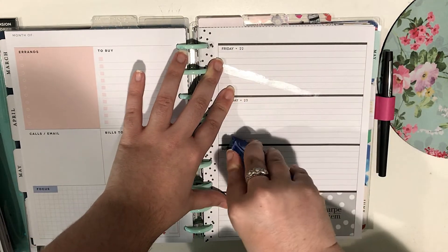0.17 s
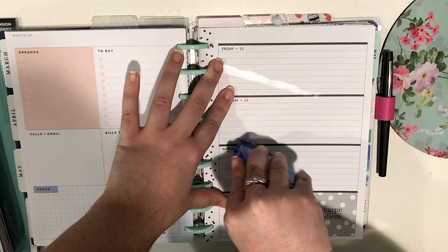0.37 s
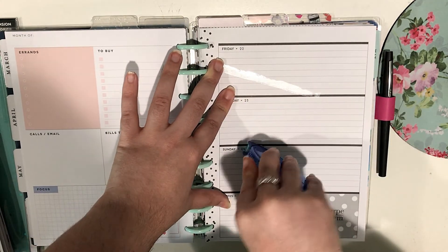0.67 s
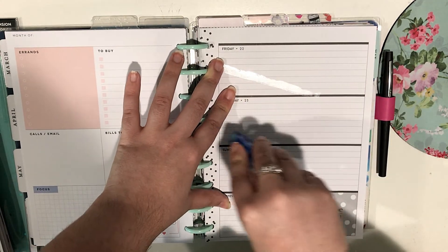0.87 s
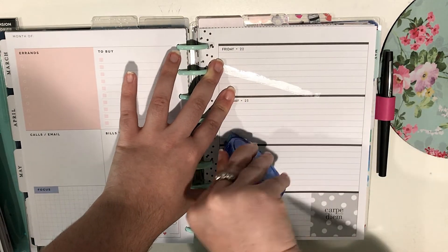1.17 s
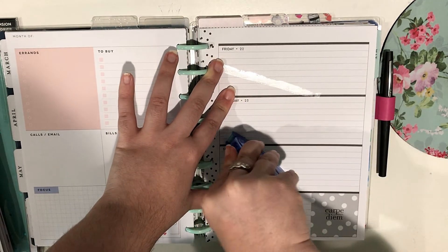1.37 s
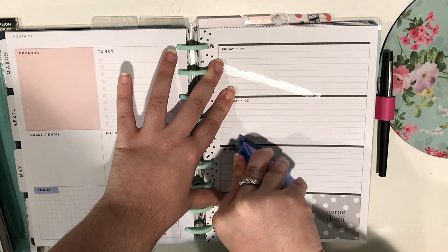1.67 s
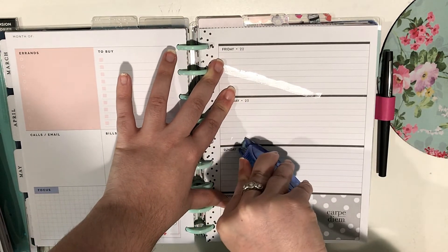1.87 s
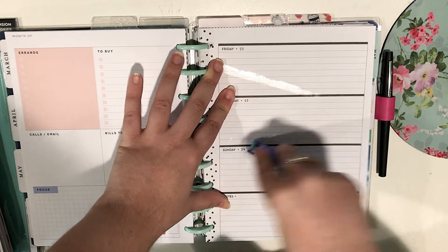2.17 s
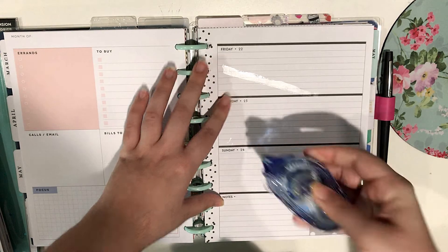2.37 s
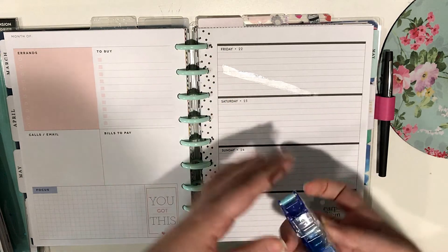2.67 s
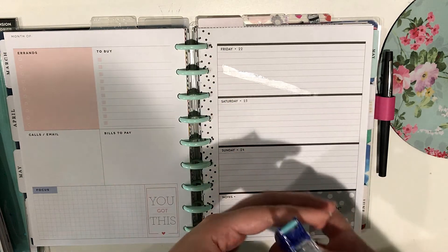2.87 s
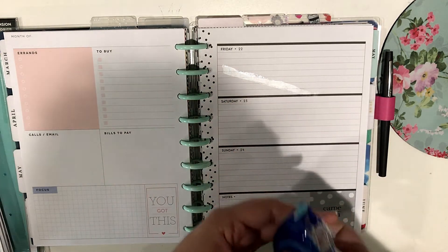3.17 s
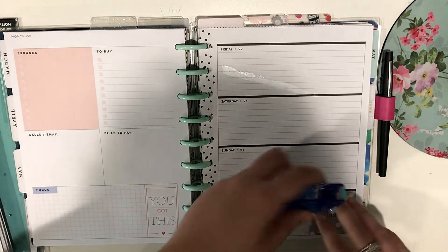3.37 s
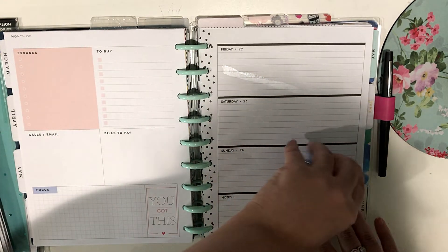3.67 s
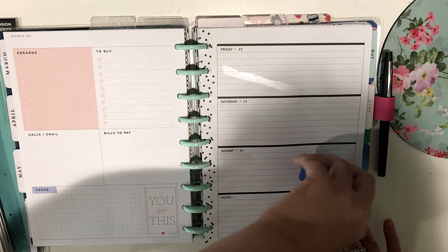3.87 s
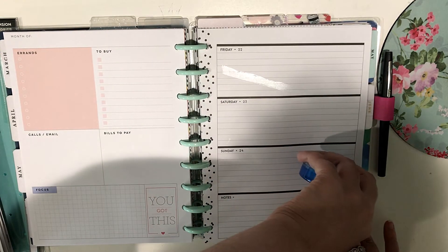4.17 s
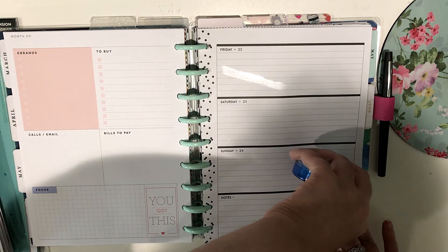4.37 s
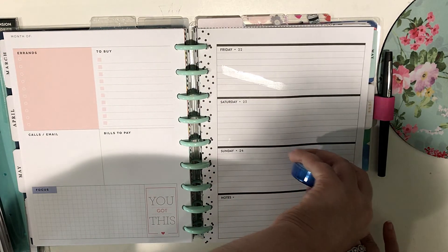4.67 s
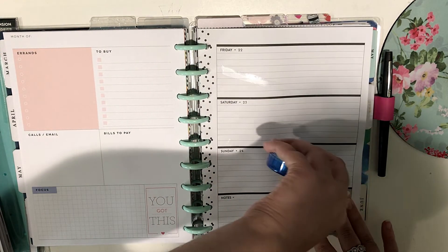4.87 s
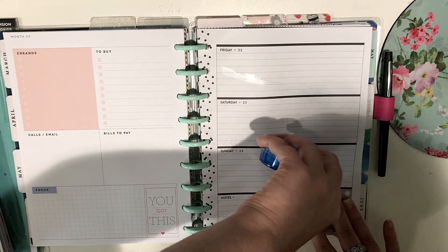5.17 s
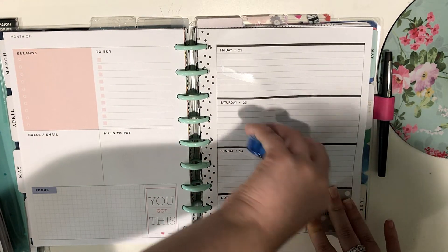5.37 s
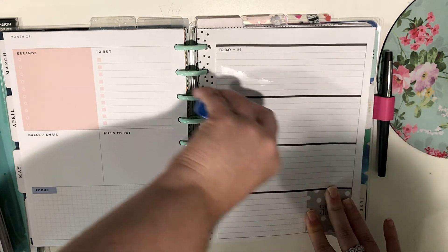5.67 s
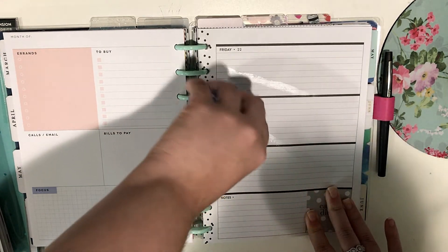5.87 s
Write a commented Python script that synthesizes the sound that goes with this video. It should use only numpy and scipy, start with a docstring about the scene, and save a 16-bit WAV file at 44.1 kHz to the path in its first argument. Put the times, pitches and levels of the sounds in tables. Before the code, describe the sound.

Light plastic clicks, creaks and paper brushing on a desk lead to two short, hissing, rattling pulls of a tape runner.

```python
"""A tape runner is pressed and dragged over the pages of a planner on a desk in a quiet room.
In two strokes its ratchet (a toothed wheel) snaps tooth by tooth and makes the plastic case ring.
The case creaks, case and paper give small clicks, skin brushes the paper and the desk thumps softly.
Underneath, the house rumbles and hums."""
import sys
import numpy as np
from scipy import signal
from scipy.fft import rfft, irfft
from scipy.io import wavfile

SR = 44100
rng = np.random.default_rng(int(sys.argv[2]) if len(sys.argv) > 2 else 0)


def log_audio(samples):
    """Write samples as a 16-bit WAV file to the path given in sys.argv[1]."""
    # one column per channel
    frames = np.atleast_2d(samples).T
    # limit to full scale, then quantise
    limited = np.clip(frames, -1, 1)
    pcm = np.round(limited * 32767).astype(np.int16)
    wavfile.write(sys.argv[1], SR, pcm)


N = 265041

# Tone colours, or how strong each frequency is next to the others: f/Hz, level/dB
RUMBLE_COLOUR = [(12, -51), (20, -17.5), (32, -9.5), (59, -2), (81, 1.5), (108, -1), (127, 2), (145, -4),
                 (157, -6.5), (172, -13), (200, -34.5), (234, -35), (300, -24.5), (390, -58), (660, -120)]
AIR_COLOUR = [(120, -13.5), (200, 6), (258, -4), (761, -13), (1060, -14), (1730, -17.5), (2080, -16),
              (2790, -19.5), (6850, -21), (7640, -26), (12800, -23.5), (15900, -28)]
SKIN_COLOUR = [(1470, -31), (2500, -2.5), (2680, -6), (3030, -8), (3800, -10), (4200, -9), (5510, -11),
               (6140, -10), (8430, -11.5), (15900, -14)]
TICK_COLOUR = [(410, -34.5), (700, -6.5), (1700, -13.5), (2040, -8.5), (2450, -1.5), (3490, -23), (4480, 0),
               (15900, -14)]
SNAP_COLOUR = [(400, -72.5), (900, -18.5), (2000, -18.5), (3500, -22), (4700, -14.5), (6400, -16.5),
               (8500, -9.5), (10300, -14), (13000, -9), (14700, -8), (15900, -9.5)]

# Resonances, the pitches at which a thing likes to ring: f/Hz, width/Hz, level/dB
DESK_MODES = [(103.4, 9.3, 2), (134.5, 14.7, 20), (230, 104, -5)]
PAGE_MODES = [(346, 85, -6), (562, 90, -6.5), (1009, 370, -7)]
HOLLOW_MODES = [(1242, 190, -6), (1630, 154, 1.5), (1843, 163, 1.5)]   # the air inside the case
SHELL_MODES = [(2550, 152, 1), (2930, 128, -0.5), (3217, 99, 1.5), (3948, 305, -2.5)]   # the walls of the case
PAWL_MODES = [(5260, 166, 4.5), (5870, 660, 3.5), (6620, 610, 6.5), (7520, 310, 3.5), (8280, 1000, -5.5)]   # the pawl, a small catch that rides over the teeth

# Echoes off the desk and pages: delay/s, level/dB
ECHOES = [(.0014, -14.5), (.0031, -20), (.0052, -16.5)]
# How loud the hum is over time: t/s, level/dB
HUM_LEVELS = [(0.0, -47.5), (0.5, -51.5), (0.85, -58), (1.02, -57), (1.2, -50.5), (1.9, -56), (2.29, -45.5),
              (2.46, -67), (2.85, -59.5), (3.3, -43.5), (3.8, -46), (4.03, -55), (4.28, -46.5), (4.74, -50),
              (4.97, -54.5), (5.2, -49.5), (5.5, -68), (5.71, -48), (6.01, -48.5)]
# A faint whistle comes and goes: t/s, length/s, level/dB
WHISTLES = [(0.0, 0.086, -60), (.17, 0.018, -65), (.24, .14, -66), (2.43, .19, -72)]
# Faint narrow tones that come and go: t/s, length/s, level/dB, f/Hz
FAINT_RINGS = [(3.595, 0.036, -67, 810), (3.723, 0.045, -66, 940), (3.89, 0.092, -59, 2680),
               (4.014, 0.021, -52.5, 2600), (4.17, 0.22, -68, 2710)]
# Skin brushes the paper: t/s, length/s, level/dB
BRUSHES = [(0.0, 0.027, -59.5), (.35, 0.085, -61), (.495, .02, -62), (.72, 0.11, -61), (.995, 0.018, -63),
           (1.525, .02, -61), (1.62, 0.017, -60.5), (1.7, 0.033, -60.5), (1.805, 0.02, -55.5),
           (1.98, 0.013, -60), (2.255, 0.086, -60.5), (2.67, 0.025, -59.5), (2.85, 0.013, -63),
           (3.07, 0.11, -62.5), (3.4, 0.19, -70), (3.68, 0.036, -61), (3.885, 0.019, -69),
           (4.17, 0.061, -59.5), (4.27, 0.086, -55)]
# The hand squeezes the case against the pages: t/s, length/s, creak level/dB, page level/dB
SQUEEZES = [(.165, 0.14, -62.5, -69), (.4, 0.089, -70, -64.5), (.72, 0.022, -64, -60),
            (.77, 0.022, -61, -66), (1.04, 0.023, -58.5, -65), (1.13, 0.17, -76, -64),
            (1.41, 0.0095, -69, -67), (1.525, .03, -66, -67), (1.7, 0.17, -67.5, -74),
            (1.985, .02, -72, -82), (2.095, 0.036, -55, -61), (2.195, 0.012, -57, -85),
            (2.25, 0.13, -63.5, -72), (2.44, 0.096, -69, -79), (2.64, 0.062, -61, -72),
            (2.85, 0.0071, -62, -91), (3.07, 0.038, -61.5, -80), (3.32, 0.02, -64, -80),
            (3.415, 0.039, -73, -69), (3.61, 0.1, -61.5, -68), (3.74, 0.028, -78, -71),
            (3.82, 0.011, -63, -70), (3.885, 0.039, -49.5, -58), (3.95, 0.066, -60.5, -68),
            (4.02, 0.065, -58.5, -60), (4.17, .18, -70.5, -71), (4.46, 0.071, -83, -63),
            (4.61, 0.051, -56.5, -61.5)]
# The tape drags, one list for each stroke: t/s, hiss level/dB, creak level/dB, page level/dB
STROKES = [
    [(4.65, -52, -51, -63), (4.68, -53, -64, -62), (4.82, -45, -41, -51), (4.95, -52, -66, -58),
     (5.1, -50, -53, -61), (5.18, -62, -64, -62), (5.22, -85, -85, -80)],
    [(5.293, -62, -66, -66), (5.33, -45, -50, -51), (5.5, -45.5, -48.5, -63), (5.63, -39.5, -41, -52),
     (5.72, -34.5, -42, -56), (5.78, -66, -51, -54), (5.91, -58, -55.5, -68.5), (5.96, -74, -73, -71)],
]
# Pushes into the desk: t/s, desk level/dB, page level/dB
THUMPS = [(.2478, -44, -38.5), (.2932, -48, -37), (.5082, -48, -62), (.9937, -39, -44), (1.0021, -36, -47),
          (1.1218, -53, -44), (1.1506, -35, -49), (1.1657, -31, -38.5), (1.1837, -26, -50),
          (1.2042, -32.5, -33.5), (1.2256, -26, -36), (1.4092, -41.5, -70), (1.517, -41.5, -43.5),
          (1.5324, -49, -42), (2.3266, -40, -36), (3.22, -49, -50), (3.8357, -69, -45), (3.8618, -59, -48),
          (4.0143, -47, -42), (4.4039, -55, -43), (4.4518, -40, -61), (4.5461, -43, -43),
          (4.7188, -30, -72), (4.7638, -32, -62), (4.8066, -35, -64), (4.9391, -45, -51),
          (5.1738, -45, -39), (5.3103, -56, -48), (5.675, -38, -37), (5.7006, -38.5, -37)]
# Small clicks of case and paper, and weak slips of the ratchet's teeth during the first stroke:
# t/s, crack level/dB, hollow level/dB, shell level/dB
TICKS = [(0.0189, -49, -56, -71), (0.0583, -42, -46.5, -58), (0.159, -28, -31.5, -40),
         (0.2483, -25.5, -34, -37), (0.293, -21, -36.5, -39.5), (0.4034, -43, -49, -60),
         (0.4909, -34, -51, -50), (0.5089, -35, -48, -49), (0.5692, -33, -41.5, -46),
         (0.625, -40, -61, -47), (0.693, -62, -53, -52), (0.7262, -37, -33.5, -42), (0.7729, -39, -43, -66),
         (0.84, -40, -45.5, -61), (0.9938, -27.5, -46, -50), (1.0018, -21, -40.5, -36.5),
         (1.1216, -24.5, -46, -47), (1.1646, -44, -53, -51), (1.1826, -37, -40.5, -47),
         (1.2036, -33, -40, -42), (1.2251, -40, -48, -44), (1.2372, -38, -51, -46),
         (1.3455, -36.5, -44, -48.5), (1.4102, -35, -45.5, -47), (1.5164, -43, -53, -54),
         (1.5296, -34, -41, -51), (1.681, -26, -41.5, -51), (1.7715, -53, -66, -58), (2.024, -31, -53, -59),
         (2.0498, -39, -46, -47.5), (2.097, -54, -37, -46.5), (2.1326, -38, -30, -42.5),
         (2.1888, -31.5, -44, -38.5), (2.2037, -43, -44, -61), (2.2523, -45, -47, -54),
         (2.2592, -39, -42.5, -54), (2.3261, -25.5, -22.5, -25), (2.376, -53, -41, -51),
         (2.4664, -51, -44.5, -52), (2.581, -44.5, -68, -60), (2.6362, -47, -46, -64),
         (2.6845, -34.5, -49.5, -50), (2.8466, -29, -39, -39.5), (2.8611, -31, -49, -49),
         (2.9564, -60, -51, -59), (3.0581, -40, -43.5, -49), (3.088, -44, -44, -42),
         (3.16, -30.5, -36.5, -40.5), (3.1944, -39.5, -58, -51), (3.2197, -56, -53, -52),
         (3.2968, -44, -53, -62), (3.3278, -41, -51, -52), (3.4087, -34, -47, -41),
         (3.4267, -30.5, -38.5, -37.5), (3.463, -44, -52, -45.5), (3.5883, -37, -45.5, -43),
         (3.6212, -42, -48, -48), (3.6709, -24, -48, -41), (3.699, -19, -51, -36), (3.7185, -41, -41, -50),
         (3.8072, -41.5, -49, -58), (3.8453, -37.5, -44, -46.5), (3.8843, -38, -35, -51),
         (3.965, -59, -62, -46.5), (4.0149, -21, -37, -31), (4.0714, -43, -64, -56),
         (4.2895, -43, -45, -53), (4.3145, -41, -43, -49), (4.3434, -47, -48, -55),
         (4.4046, -35.5, -39, -42.5), (4.4523, -40, -49, -44.5), (4.4722, -31.5, -53, -48),
         (4.5208, -42, -47, -46.5), (4.5456, -52, -49, -52), (4.6124, -66, -59, -48),
         (4.9376, -26, -34, -39), (4.9724, -20, -39, -35), (5.0344, -33, -46, -48), (5.0494, -33, -53, -43),
         (5.0703, -38, -52, -37), (5.0874, -18.5, -31, -32), (5.1571, -20, -38, -32.5),
         (5.1652, -26, -54, -46), (5.173, -33, -56, -38.5), (5.7847, -21, -56, -36),
         (5.8279, -30, -42, -44), (5.87, -37, -49, -46), (5.8958, -22, -46, -38.5)]
# Ringing next to a tooth's snap: t/s, hollow level/dB, shell level/dB, pawl level/dB
TOOTH_RING = [(4.66, -21, -11, -8.5), (4.72, -13.5, -16.5, -15), (4.765, -16.5, -16, -12.5),
              (4.79, -22, -21, -16), (4.82, -12, -21, -17.5), (4.88, -19.5, -22, -20),
              (5.0, -23.5, -21, -18.5), (5.1, -21, -17, -17), (5.3, -28, -16.5, -22.5),
              (5.34, -27, -26, -14), (5.37, -20, -30.5, -9), (5.44, -19.5, -15.5, -7),
              (5.5, -22.5, -18.5, -9.5), (5.54, -13.5, -17.5, -9.5), (5.6, -19.5, -17.5, -11),
              (5.7, -11, -19.5, -6), (5.74, -19, -24, -18)]
# The teeth of the ratchet snap: t/s, level/dB
TEETH = [(4.6622, -9), (4.719, -5.5), (4.7437, -4.5), (4.7644, -6.5), (4.7913, -5), (4.8068, -4),
         (4.82, -1.5), (4.8352, -6), (4.8774, -1.5), (4.9175, -2.5), (4.996, -2), (5.0978, -1.5),
         (5.2948, -16.5), (5.3099, 0.5), (5.339, -2.5), (5.3565, -2), (5.3737, -2), (5.395, -2),
         (5.4196, -4.5), (5.441, -4), (5.462, -5), (5.4919, -3.5), (5.5229, -8), (5.5392, -5.5),
         (5.553, -5), (5.5703, -7), (5.5876, -3.5), (5.6053, -4), (5.617, -5.5), (5.6283, -6.5),
         (5.6408, -6), (5.6512, -5.5), (5.6612, -8.5), (5.675, -8.5), (5.6879, -9.5), (5.7018, -10),
         (5.717, -9.5), (5.7384, -3)]

RUMBLE_DB, AIR_DB, MAINS_DB = -48.5, -62, -57.5
MAINS_HZ, HUM_HZ, WHISTLE_HZ = 52, 108.5, 2396
ROOM_T60_S, ROOM_DB = 0.13, -16   # a T60 is the time a sound takes to fade by 60 dB
SWELL_DB_PER_S, FADE_DB_PER_S = 443, 321
RESTING_DB = (-81.5, -97, -81)   # hiss, creak and page rustle of hands at rest
SLIPS_PER_S = 135   # typical pace of a creak
FAINT_TICKS, FAINT_DB = 30, (-48, -58, -58.5)   # extra random ticks: average crack, hollow, shell
TOOTH_DESK_DB, TOOTH_PAGE_DB = -48, -49   # push of a tooth, next to its snap
TICK_PAGE_DB = -18   # push of a tick, next to its hollow ring
CREST_DB = 11.5   # how far the peaks of a chatter stand above its average (rms) level


def amp(db):
    """Turn decibels into a number to multiply by."""
    return 10 ** (np.asarray(db) / 20)


def rms_one(x):
    """Scale a sound to an average strength (rms) of 1."""
    return x / np.sqrt(np.mean(x ** 2) + 1e-20)


def in_time(rows):
    """Join the points of a table with straight lines, one curve for each level column."""
    times, *columns = np.transpose(rows)
    return [np.interp(np.arange(N) / SR, times, column) for column in columns]


def swells(rows, column=2):
    """Loudness of sounds that swell up to their start time, hold for their length and fade."""
    t, gain = np.arange(0, N, 32) / SR, 0
    for row in rows:
        start, length = row[:2]
        drop_db = np.maximum(SWELL_DB_PER_S * (start - t), FADE_DB_PER_S * (t - start - length))
        gain = gain + amp(row[column] - np.maximum(0, drop_db))
    return np.interp(np.arange(N) / SR, t, gain)


def colour(x, spectrum):
    """Give a sound a tone colour; white noise keeps its power."""
    hz, db = np.transpose(spectrum)
    grid_hz = np.maximum(np.arange(16385) * SR / 32768, 1)
    gain = rms_one(amp(np.interp(np.log(grid_hz), np.log(hz), db)))
    # A minimum-phase filter: nothing sounds before the click that causes it.
    cepstrum = irfft(np.log(gain))
    cepstrum[1:16384] *= 2
    cepstrum[16385:] = 0
    return signal.fftconvolve(x, irfft(np.exp(rfft(cepstrum))))[:N]


def resonate(x, modes):
    """Ring several resonances at once, with alternating signs; white noise keeps its power."""
    def ring(push):
        total = 0
        for k, (hz, width, db) in enumerate(modes):
            r = np.exp(-np.pi * max(width, 5) / SR)
            feedback = [1, -2 * r * np.cos(2 * np.pi * hz / SR), r * r]
            mode = signal.lfilter([1 - r * r, 0, r * r - 1], feedback, push + 1e-18)
            total = total + (-1) ** k * amp(db) * mode
        return total
    return ring(x) / np.sqrt(np.sum(ring(signal.unit_impulse(8192)) ** 2))


def drift(rate_hz):
    """A smooth random wobble, about 1 in size."""
    r = np.exp(-2 * np.pi * rate_hz / SR)
    return rms_one(signal.lfilter([1], [1, -2 * r, r * r], rng.standard_normal(N + SR))[SR:])


def wavering(hz, spread_hz):
    """A tone whose pitch wanders slowly."""
    pitch_hz = hz + spread_hz * drift(3.04)
    return np.sqrt(2) * np.sin(2 * np.pi * np.cumsum(pitch_hz) / SR)


def pitched_noise(hz, width_hz):
    """Noise sent twice through one resonance becomes a breathy note."""
    mode = [(hz, width_hz, 0)]
    return rms_one(resonate(resonate(rng.standard_normal(N), mode), mode))


def impulses(times, db):
    """One sharp spike at each time."""
    spikes = np.zeros(N)
    np.add.at(spikes, np.minimum((times * SR).astype(int), N - 1), amp(db))
    return spikes


def chatter(spread_db):
    """Tightly packed tiny hits whose strength flickers."""
    return rms_one(rng.choice([-1., 1.], N) * amp(spread_db * drift(1290)))


def bursts(times, db, t60, first_hit, spread_db):
    """Each contact is one hit, then a chatter that dies away."""
    hits = impulses(times + 0.0004, db)
    fade = signal.lfilter([1], [1, -amp(-60 / (t60 * SR))], hits + 1e-18)
    return first_hit * hits + fade * chatter(spread_db)


def near_echoes(x):
    """Bounces off the desk and pages stretch a sound by a few milliseconds."""
    return x + sum((-1) ** k * amp(db) * np.pad(x, (int(delay * SR), 0))[:N]
                   for k, (delay, db) in enumerate(ECHOES))


def room(x):
    """The walls answer with a short, slightly dull wash of echoes."""
    t = np.arange(int(.4 * SR)) / SR
    tail = rng.standard_normal(len(t)) * amp(-60 * t / ROOM_T60_S) * (t > .004)
    tail = signal.lfilter([1], [1, -.3], tail)
    return signal.fftconvolve(x, tail / np.sqrt(np.sum(tail ** 2)))[:N]


def background():
    """House rumble, mains drone, a hum with a weak octave, room air and a faint whistle."""
    rumble = amp(RUMBLE_DB) * rms_one(colour(rng.standard_normal(N), RUMBLE_COLOUR))
    hum_tone = wavering(HUM_HZ, spread_hz=2.49) + amp(-37.5) * wavering(2 * HUM_HZ, spread_hz=2.1)
    hum = amp(in_time(HUM_LEVELS)[0]) * hum_tone
    air = amp(AIR_DB) * rms_one(colour(rng.standard_normal(N), AIR_COLOUR))
    mains = amp(MAINS_DB) * wavering(MAINS_HZ, spread_hz=1.5)
    whistle = swells(WHISTLES) * pitched_noise(WHISTLE_HZ, width_hz=70)
    return rumble + mains + hum + air + whistle


def faint_rings():
    """Faint narrow tones ring on, one pitch at a time."""
    return sum(swells([row]) * pitched_noise(row[3], width_hz=130) for row in FAINT_RINGS)


def paper_hiss():
    """Rubbing on paper hisses, with tiny scratches and a slowly shifting colour."""
    catches = (rng.random(N) < 150 / SR) * rng.exponential(.8, N)   # about 150 a second
    scratches = signal.lfilter([1], [1, -.985], catches)
    rub = colour(rms_one(rng.standard_normal(N) * (1 + scratches)), SKIN_COLOUR)
    edges_hz, hiss = np.geomspace(1500, 17000, 25), 0
    for low, high in zip(edges_hz, edges_hz[1:]):
        band = signal.sosfilt(signal.butter(2, [low, high], "band", fs=SR, output="sos"), rub)
        hiss = hiss + amp(1.6 * drift(4)) * band
    return amp(1.9 * drift(30)) * rms_one(near_echoes(hiss))


def case_creak(gain):
    """The squeezed plastic sticks and slips at a nearly even pace, ringing the case."""
    slip_count = np.cumsum(SLIPS_PER_S * amp(2.0 * drift(20)) / SR)
    times = np.flatnonzero(np.diff(np.floor(slip_count))) / SR
    slip_db = rng.normal(0, 3.0, N)[:len(times)]
    grit = gain * rms_one(bursts(times, slip_db, t60=.014, first_hit=3.0, spread_db=1.5))
    ring = resonate(grit, HOLLOW_MODES) + amp(-10) * resonate(grit, SHELL_MODES)
    return ring + amp(-14.5) * colour(grit, TICK_COLOUR)


def page_rustle():
    """Shuffling pages send uneven tiny hits through the stack."""
    return amp(3.5 * drift(30)) * resonate(chatter(spread_db=2.5), PAGE_MODES)


def handling():
    """The dragging tape and the hands set how loud the creak, rustle and hiss are."""
    t = np.arange(N) / SR
    drag = sum(amp(in_time(rows)) * (t > rows[0][0]) * (t < rows[-1][0]) for rows in STROKES)
    hands = np.array([swells(BRUSHES), swells(SQUEEZES), swells(SQUEEZES, column=3)])
    hiss_gain, creak_gain, page_gain = drag + hands + amp(RESTING_DB)[:, None]
    return case_creak(creak_gain) + page_gain * page_rustle() + hiss_gain * paper_hiss()


def thump(times, db, modes):
    """A soft push into a heavy body; 0 dB gives a peak of 1."""
    def body(push):
        return resonate(signal.lfilter([1], [1, -.95], push), modes)
    return body(impulses(times, db)) / body(signal.unit_impulse(2048)).max()


def knocks():
    """Pushes and snapping teeth shake both desk and pages; ticks only tap the pages."""
    teeth = [(time, db + TOOTH_DESK_DB, db + TOOTH_PAGE_DB) for time, db in TEETH]
    times, desk_db, page_db = np.transpose(list(THUMPS) + teeth)
    tick_times, _, hollow_db, _ = np.transpose(TICKS)
    pages = thump(np.r_[times, tick_times], np.r_[page_db, hollow_db + TICK_PAGE_DB], PAGE_MODES)
    return thump(times, desk_db, DESK_MODES) + pages


def case_ring(times, hollow_db, shell_db, t60):
    """The plastic case rings; the air inside answers a little later than the walls."""
    hollow_hits = bursts(times + .0012, hollow_db, t60, first_hit=3.83, spread_db=0.21)
    shell_hits = bursts(times, shell_db, t60, first_hit=3.6, spread_db=0.84)
    return resonate(hollow_hits, HOLLOW_MODES) + resonate(shell_hits, SHELL_MODES)


def ticks():
    """Small clicks of case and paper, and weak tooth slips in the first stroke, ring the case."""
    faint_times = rng.uniform(0, N / SR, FAINT_TICKS)
    faint = np.c_[faint_times, rng.normal(FAINT_DB, 4, (FAINT_TICKS, 3))]
    times, crack_db, hollow_db, shell_db = np.r_[faint, TICKS].T
    cracks = bursts(times, crack_db - CREST_DB, t60=0.022, first_hit=0.5, spread_db=1.0)
    return colour(cracks, TICK_COLOUR) + case_ring(times, hollow_db, shell_db, t60=0.022)


def ratchet():
    """Each tooth slips with a bright snap; the pawl sings near 6 kHz and the case rings."""
    times, db = np.transpose(TEETH)
    ring_times, *rings = np.transpose(TOOTH_RING)
    ring_db = np.array([np.interp(times, ring_times, ring) for ring in rings])
    chance_db = 1.5 * rng.standard_normal((len(times), 3)).T   # no two teeth ring alike
    hollow_db, shell_db, pawl_db = db + ring_db + chance_db
    snap_hits = bursts(times, db - CREST_DB, t60=0.018, first_hit=3.8, spread_db=0.88)
    pawl_hits = bursts(times, pawl_db, t60=0.015, first_hit=4.2, spread_db=0.71)
    case = case_ring(times, hollow_db, shell_db, t60=0.014)
    return colour(snap_hits, SNAP_COLOUR) + resonate(pawl_hits, PAWL_MODES) + case


def scene():
    """Clicks and knocks echo in the room; rubbing and background lie under them."""
    hits = near_echoes(ratchet() + ticks()) + knocks()
    return (hits + amp(ROOM_DB) * room(hits) + handling() + faint_rings() + background())[None]


def record(dry):
    """Round off the loudest peaks and cut the highest treble."""
    ceiling, cutoff_hz = .85, 16250
    rounded = ceiling * np.tanh(dry / ceiling)
    return signal.sosfilt(signal.cheby2(20, 60, cutoff_hz, fs=SR, output="sos"), rounded)


dry = scene()
out = record(dry)
log_audio(out)
```